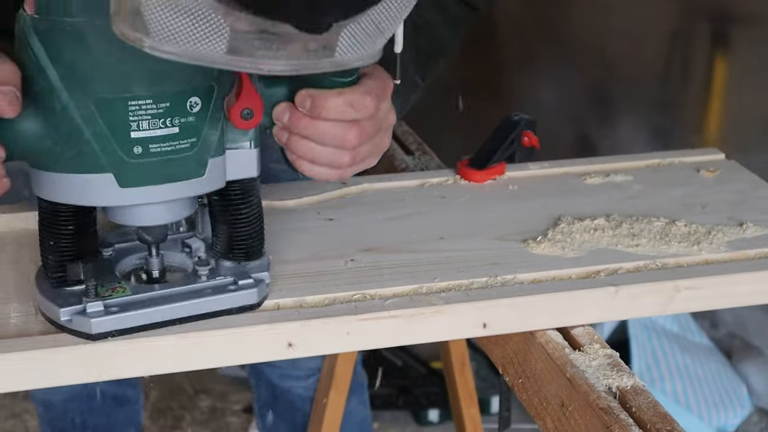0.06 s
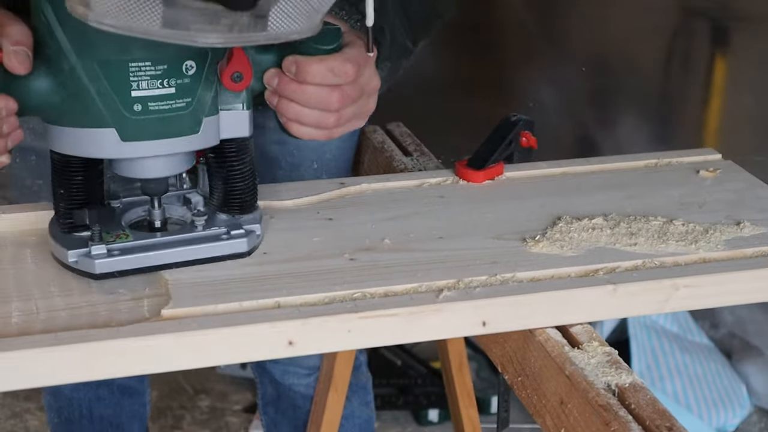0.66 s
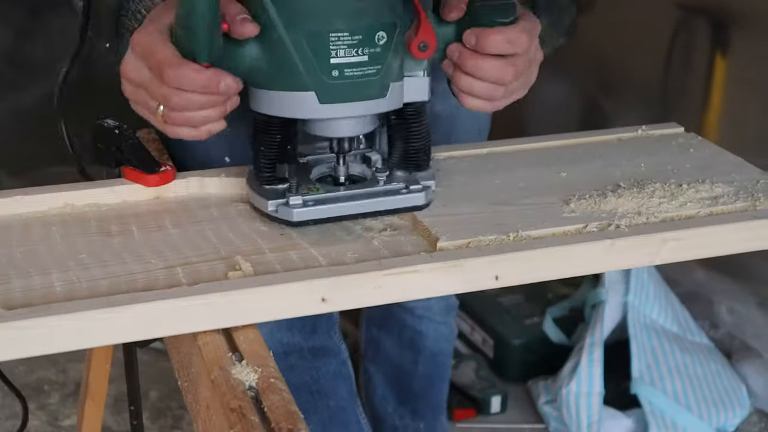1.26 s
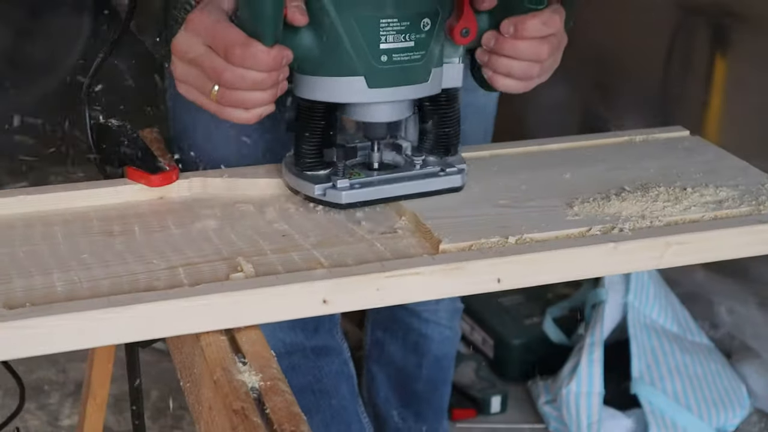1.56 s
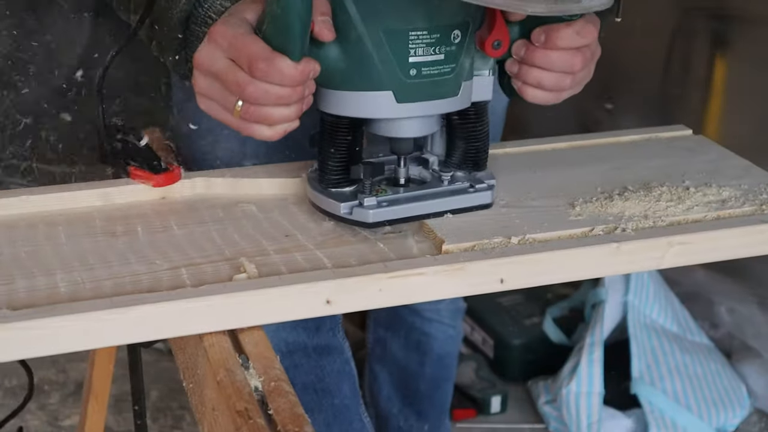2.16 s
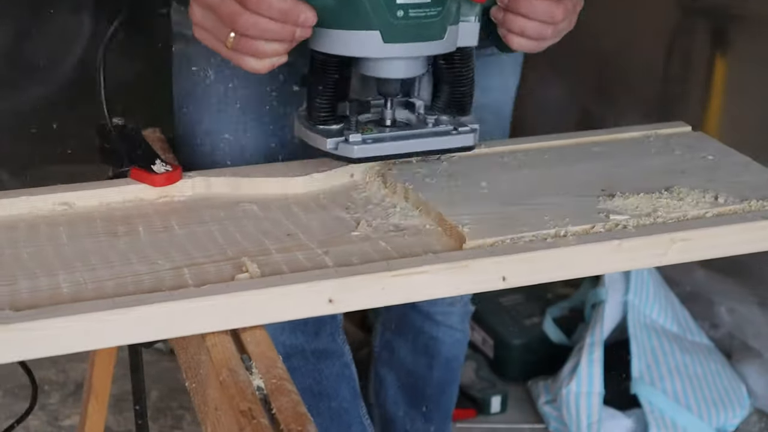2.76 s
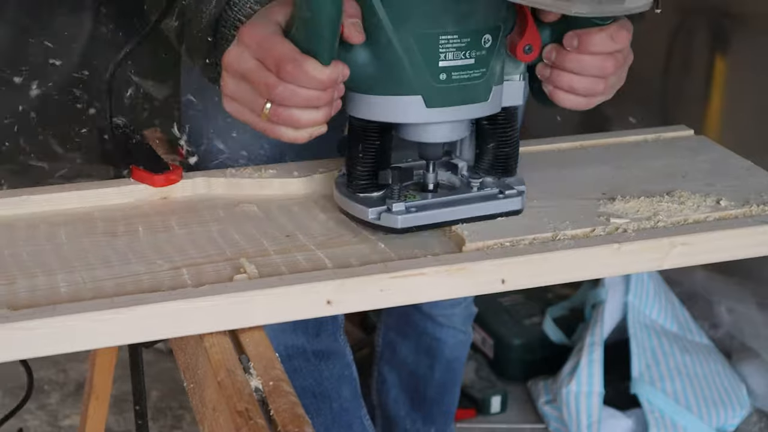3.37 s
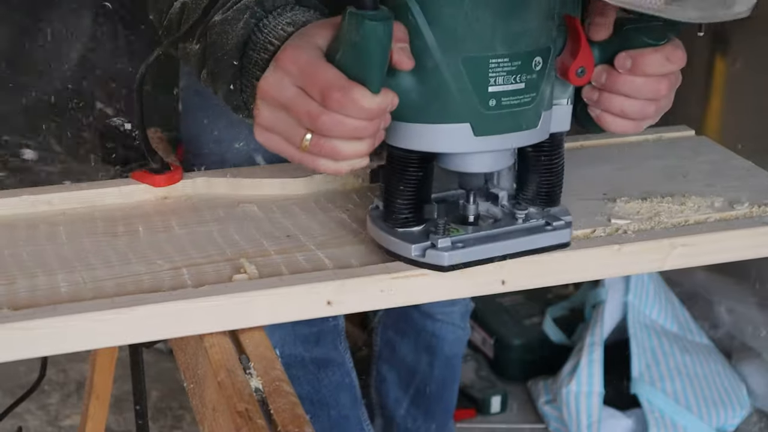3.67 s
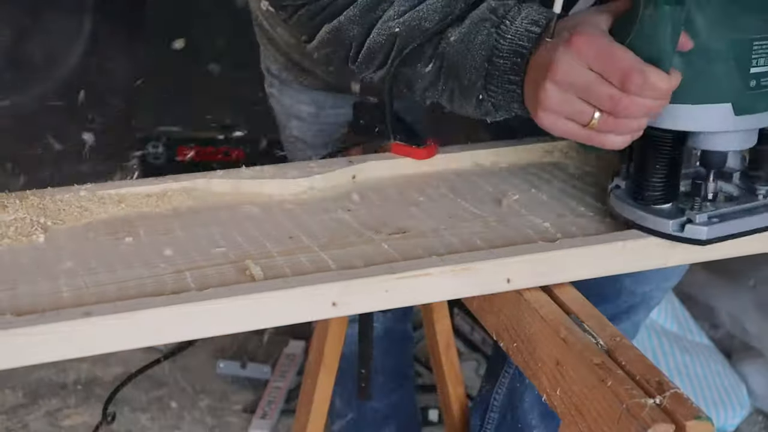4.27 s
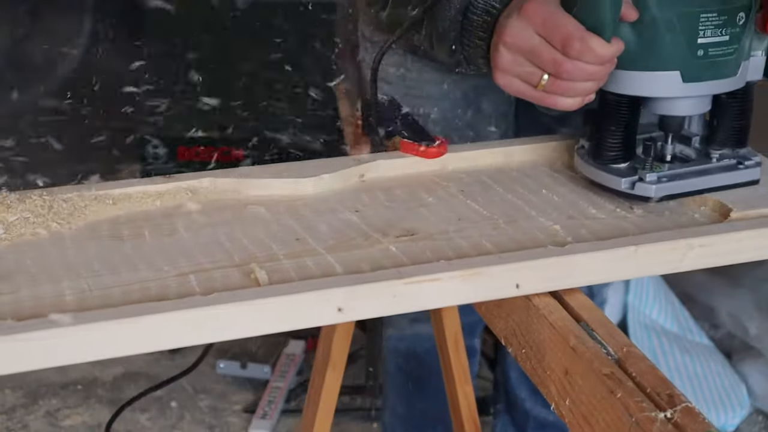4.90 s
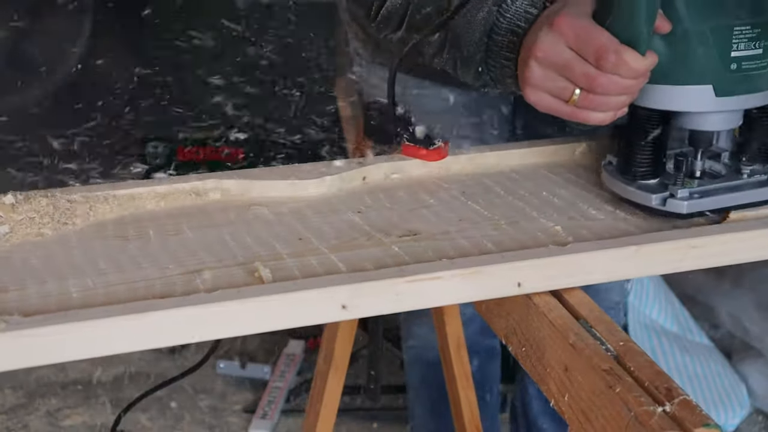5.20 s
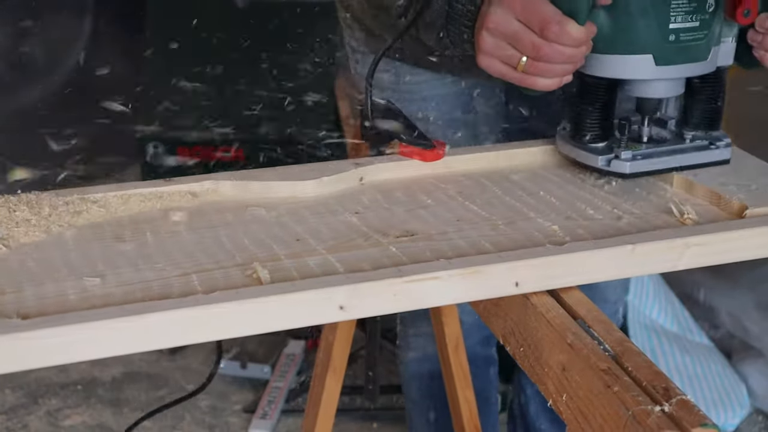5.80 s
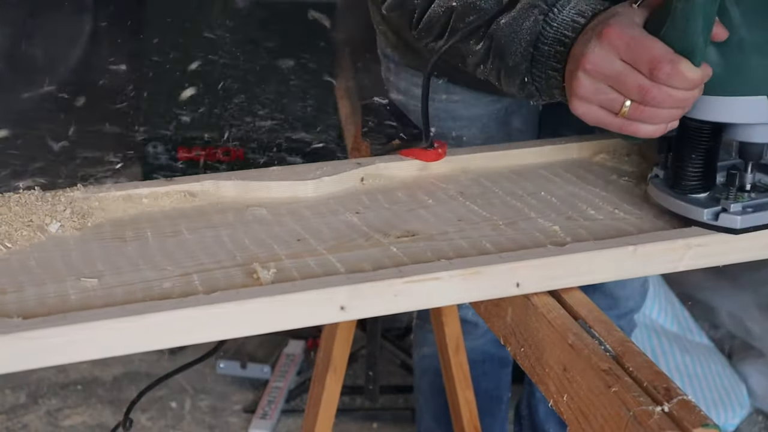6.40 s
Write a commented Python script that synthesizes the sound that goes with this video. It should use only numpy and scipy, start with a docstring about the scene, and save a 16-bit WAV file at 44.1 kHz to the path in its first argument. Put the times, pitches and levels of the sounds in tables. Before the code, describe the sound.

Short, high-pitched bursts of a router milling wood, dipping in pitch under load, with chip spray, ticks and one brief low drone.

```python
"""A high, squealing whine in quick bursts: a plunge router milling a recess in a board, in fast motion.
In each pass the spindle spins up, sags under load and coasts down. The bit chatters in the cut, air and
chips rush out, splinters tear, the base knocks and scrapes on the wood, and handling adds sharp ticks.
Once, the whine gives way to a low drone: the spindle at its natural pace."""
import sys
import numpy as np
from scipy import signal
from scipy.fft import rfft, irfft
from scipy.io import wavfile

SR = 44100
rng = np.random.default_rng(int(sys.argv[2]) if len(sys.argv) > 2 else 0)


def to_wav(sig):
    """Store sig (one row per channel, or 1-D mono) as 16-bit WAV at the path in sys.argv[1].

    Samples outside -1..1 are clipped; the rate is SR.
    """
    pcm = np.clip(np.atleast_2d(sig), -1, 1) * 32767
    pcm = np.round(pcm).astype(np.int16)
    wavfile.write(sys.argv[1], SR, pcm.T)  # frames by channels


N = 284440
TIME = np.arange(N) / SR

# passes of the tool, with the levels of its four harmonics and its air:
# on_s, off_s, shaft_db, flute_db, third_db, fourth_db, air_db, coasting_air_db, starting_kick_db
PASSES = [(-.2, 0.222, -51.5, -40, -48, -43.5, -39, -50.5, -5),
          (0.382, 0.975, -53.5, -42.5, -48, -46.5, -40.5, -75, 8),
          (1.446, 1.755, -43.5, -47.5, -48.5, -49.5, -38.5, -40.5, 15),
          (1.952, 2.702, -44, -41, -42, -50, -39.5, -51.5, 14),
          (2.881, 3.846, -45.5, -39, -41, -47.5, -40, -54, -6),
          (4.007, 4.282, -53.5, -47.5, -54, -56, -41, -47.5, 6.5),
          (4.493, 5.405, -52.5, -40, -49, -48.5, -39.5, -55.5, 9),
          (5.502, 6.6, -50, -36.5, -47, -47.5, -38, -55, -8)]
# cuts in which the bit chatters:
# start_s, end_s, pitch_hz, chatter_start_db, chatter_end_db, sideband_db, flute_boost_db
CUTS = [(-.02, 0.21, 5400, -40, -39, -44, 3.5), (0.479, 0.969, 5390, -45, -36.5, -45.5, 3.5),
        (1.477, 1.678, 5410, -35.5, -35, -44.5, 9), (2.096, 2.217, 5375, -27.5, -38.5, -44.5, 2),
        (2.213, 2.596, 5420, -44, -41.5, -44, 0), (2.977, 3.424, 5430, -39.5, -33.5, -47.5, -3.5),
        (3.432, 3.742, 5420, -46, -42, -45, 1.5), (4.076, 4.284, 5470, -34.5, -44, -43, 8.5),
        (4.604, 4.979, 5436, -43, -35, -47.5, 5.5), (5.131, 5.263, 5443, -33, -33, -44, 8.5),
        (5.277, 5.408, 5396, -38, -41, -40.5, 5.5), (5.717, 6.316, 5450, -38, -32, -49, 2),
        (6.351, 6.489, 5420, -37, -22, -41, -4)]


def undb(db):
    """Decibels to gain."""
    return 10 ** (np.asarray(db) / 20)


def unit(x):
    """Scale to rms 1."""
    return x / np.sqrt(np.mean(x ** 2) + 1e-20)


def curves(table):
    """The columns of a table, joined by straight lines in time."""
    times, *columns = np.transpose(table)
    return [np.interp(TIME, times, column) for column in columns]


def since(start):
    """Seconds gone by since a moment, zero before it."""
    return np.maximum(TIME - start, 0)


def held(times, values):
    """Each value holds from its time until the next."""
    return values[np.maximum(np.searchsorted(times, TIME) - 1, 0)]


def gate(start, end, edge_s=0.019):
    """Open between two times, with short fades."""
    return np.clip(np.minimum(TIME - start, end - TIME) / edge_s + .5, 0, 1)


def walk(rate_hz):
    """Random drift with a spread near 1 that changes course rate_hz times a second."""
    steps = rng.standard_normal(N // 32)
    return 1.456 * np.interp(TIME * rate_hz, np.arange(len(steps)), steps)


def colour(x, eq, size=2048):
    """Minimum-phase EQ through (frequency_hz, gain_db) points."""
    hz, db = np.transpose(eq)
    bins_hz = np.maximum(np.fft.rfftfreq(size, 1 / SR), 1)
    gain = undb(np.interp(np.log(bins_hz), np.log(hz), db))
    cepstrum = irfft(np.log(gain))
    cepstrum[1:size // 2] *= 2
    cepstrum[size // 2 + 1:] = 0
    return signal.fftconvolve(x, irfft(np.exp(rfft(cepstrum))))[:N]


def noise(eq):
    """Coloured noise of rms 1."""
    return unit(colour(rng.standard_normal(N), eq))


def bell_eq(x, bands, q):
    """Boost or cut narrow bands of a sound."""
    return x + sum((undb(db) - 1) * signal.lfilter(*signal.iirpeak(hz, q, fs=SR), x) for hz, db in bands)


def turning(hz):
    """Phase of something that turns at this speed."""
    return 2 * np.pi * np.cumsum(hz) / SR


def partial(phase, rough, flutter_db=2.5, rough_hz=700, swell_db=2):
    """A tone that flutters and swells as the tool moves, with a skirt of noise from uneven bites."""
    skirt = walk(rough_hz) * np.sin(phase) + walk(rough_hz) * np.cos(phase)
    tone = (np.sin(phase) + rough * skirt) / np.sqrt(.5 + rough ** 2)
    return undb(flutter_db * walk(80) + swell_db * walk(16)) * tone


def blows(hits, eq, ring_s, ring):
    """Each blow is one sharp push and a brief random rattle, coloured by what is struck."""
    out, t = np.zeros(N), TIME[:2048]
    for start_s, db in hits:
        start = int(start_s * SR)
        push = ring * rng.standard_normal(len(t)) * np.exp(-t / ring_s)
        push[0] += 1
        hit = colour(push, eq)[:N - start]
        out[start:start + len(hit)] += undb(db) * hit / np.abs(hit).max()
    return out


def spindle(spin_up_s=.022, coast_s=.38, switch_s=.012, free_hz=3577, sag_hz=278):
    """The motor spins up, sags and coasts. Gives speed in Hz and, 0 to 1, power, freedom and strain."""
    # speed the motor holds against the wood, one curve a pass: time_s, speed_hz
    speed_curves = [
        [(0, 3110), (.068, 3030), (.108, 2080), (.13, 2686), (.22, 3205)],
        [(.457, 3380), (.613, 3134), (.666, 3180), (.88, 3155), (.945, 3060), (.974, 3070)],
        [(1.52, 3192), (1.58, 3270), (1.65, 3314), (1.75, 3410)],
        [(2.055, 3450), (2.09, 3426), (2.13, 3265), (2.22, 3150), (2.357, 3136), (2.43, 3217), (2.65, 3252),
         (2.71, 3365)],
        [(2.947, 3480), (2.985, 3265), (3.02, 3303), (3.057, 3206), (3.11, 3313), (3.21, 3280), (3.29, 3220),
         (3.47, 3185), (3.54, 3240), (3.6, 3167), (3.84, 3294)],
        [(4.071, 3560), (4.079, 3098), (4.163, 3137), (4.218, 2956), (4.285, 3146)],
        [(4.576, 3320), (4.64, 3240), (4.7, 3124), (4.931, 3177), (5.11, 3458), (5.176, 3146), (5.28, 3053),
         (5.364, 3112), (5.41, 2607)],
        [(5.571, 3623), (5.687, 3419), (5.733, 3228), (5.85, 3237), (6.0, 3242), (6.098, 3128), (6.322, 3207),
         (6.348, 3390), (6.44, 3237)],
    ]
    speed, power = np.zeros(N), np.zeros(N)
    for (on, off, *_), curve in zip(PASSES, speed_curves):
        aim, = curves(curve)
        running = aim + (np.interp(on, TIME, speed) - aim) * np.exp(-since(on) / spin_up_s)
        speed = np.where(TIME >= on, running * np.exp(-since(off) / coast_s), speed)
        power += (1 - np.exp(-since(on) / switch_s)) * np.exp(-since(off) / switch_s)
    load = np.clip((free_hz - speed) / sag_hz, 0, 1)
    strain = power * np.clip((3000 - speed) / 500, 0, 1)
    grain_wobble = .003 * power * load * walk(28)  # the grain makes the loaded spindle waver
    return speed * (1 + grain_wobble), power, 1 - load, strain


def levels(power, free, strain, kick_s=.08, fade_db_per_s=42):
    """dB of the four harmonics and the air: set by the pass, shifted by load, sinking with power off."""
    on, off, *driven_db, air_db, coast_db, kick_db = np.transpose(PASSES)
    free_db, free_air_db = [9, -6.5, 6.5, 3], -3.5  # shifts as the bit runs free of the wood
    strain_tone_db, strain_air_db = -1, -2.5
    idle_db = [-12.5, -34, -17, -24]  # coasting harmonics, relative to the air
    singing = power ** 2.1  # the tones build up later than the air
    kick = held(on, kick_db) * np.exp(-since(held(on, on)) / kick_s)
    effort = strain * strain_tone_db + kick
    coasting = held(off, coast_db)
    fading = coasting - fade_db_per_s * since(held(off, off))
    tones_db = [singing * (held(on, db) + free * freed + effort) + (1 - singing) * (fading + idle)
                for db, freed, idle in zip(driven_db, free_db, idle_db)]
    blowing = held(on, air_db) + free * free_air_db + strain * strain_air_db
    return tones_db, power * blowing + (1 - power) * coasting


def whine(turn, rough, tones_db, cutting, entries):
    """Six spindle harmonics: the shaft sounds once a turn, the two flutes bite twice a turn."""
    shaft_db, flute_db, third_db, fourth_db = tones_db
    *_, boost_db = np.transpose(CUTS)
    out = undb(shaft_db) * partial(turn, rough)
    out += undb(flute_db + cutting * held(entries, boost_db)) * partial(2 * turn, rough)
    out += undb(third_db) * partial(3 * turn, 2 * rough)
    # chatter blurs the clean double bite and weakens its octave
    out += undb(fourth_db - 2.2 * cutting) * partial(4 * turn, 2 * rough)
    return out + undb(fourth_db - 6.5 - 3 * cutting) * sum(partial(k * turn, 2 * rough) for k in (5, 6))


def bearings(turn, rough):
    """The bearings sing between the harmonics."""
    # bearing tones: multiple_of_spindle_speed
    orders = [1.82, 2.1, 3.1]
    return sum(partial(order * turn, 2 * rough) for order in orders)


def chatter(speed, turn, rough, strain, entries, usual_speed_hz=3200):
    """The bit shakes in the cut and squeals; each turn modulates it and throws sidebands."""
    starts, ends, cut_hz, start_db, end_db, side_db, _ = np.transpose(CUTS)
    level_db = np.interp(TIME, np.ravel([starts, ends], "F"), np.ravel([start_db, end_db], "F"))
    pitch_hz = held(entries, cut_hz) + .9 * (speed - usual_speed_hz)
    shake = turning(pitch_hz * (1 + (0.00228 + 0.0137 * strain) * walk(300)))
    squeal = undb(level_db) * partial(shake, rough)
    # sidebands of the chatter and its octave: phases, level_db
    families = [([shake + k * turn for k in (1, 2, 3)], -3),
                ([k * turn - shake for k in (4, 5)], -8),
                ([2 * shake + k * turn for k in (-1, 0, 1)], -9),
                ([2 * shake - 2 * turn, 3 * turn - shake], -18),
                ([shake - turn], -19)]
    for phases, db in families:
        sidebands = sum(partial(phase, 2 * rough, flutter_db=3) for phase in phases)
        squeal += undb(held(entries, side_db) + db) * sidebands
    return squeal


def router(speed, power, strain, tones_db, air_db, cut_edge_s=.03):
    """Whine, bearings and chatter together; the metal base plate rings as their tones sweep past."""
    # resonances of the base plate: pitch_hz, boost_db
    plate = [(9750, 2), (11900, 4.5), (13350, 10), (15000, 5)]
    rough = .08 + .7 * strain + .39 * (1 - power)  # tones rasp under strain and blur when coasting
    turn = turning(speed * (1 + (0.00098 + 0.013 * strain) * walk(400)))  # strain shakes the speed
    starts, ends, *_ = np.transpose(CUTS)
    entries = starts - cut_edge_s / 2  # the bit first touches the wood
    cutting = sum(gate(start, end, cut_edge_s) for start, end in zip(starts, ends))
    tones = whine(turn, rough, tones_db, cutting, entries)
    tones += power * undb(air_db - 24) * bearings(turn, rough)
    tones += cutting * chatter(speed, turn, rough, strain, entries)
    return bell_eq(tones, plate, q=38)


def air(air_db, attack_s=.0027, decay_s=.031):
    """Fan air and sprays of fine chips: a bright hiss that swells unevenly."""
    # sudden sprays of chips: start_s, level_db
    sprays = [(.2, -38), (1.457, -22), (1.962, -27), (3.8, -40), (4.63, -27.5), (5.12, -29.5)]
    # bright hiss of the air: frequency_hz, gain_db
    rush_eq = [(30, -42), (100, -37), (200, -21), (400, -13.5), (1400, -13.5), (2300, -3), (4500, 4.5),
               (5800, 8.5), (8500, 6.5), (12000, 6), (16000, 5)]
    # narrow peaks and a dip that colour the hiss of the air: frequency_hz, gain_db
    hiss_bands = [(1020, 11.5), (1560, 11), (1880, 4), (2280, 4), (2850, -9.5), (3750, 0), (4420, 1)]
    chips = sum(undb(db) * (1 - np.exp(-since(s) / attack_s)) * np.exp(-since(s) / decay_s)
                for s, db in sprays)
    envelope = np.hypot(undb(air_db), chips) * undb(-3 + 0.93 * walk(70))
    return envelope * bell_eq(noise(rush_eq), hiss_bands, q=18)


def wood(cracks_per_s=300):
    """Knocks, crackling splinters and gritty scrapes, all sounding through the board."""
    # the base and chips knock on the board: start_s, peak_db
    knocks = [(.213, -29.5), (.402, -29), (.705, -24), (.724, -30.5), (1.563, -29), (2.257, -28.5),
              (2.692, -22), (2.706, -24.5), (2.973, -20.5), (2.984, -21.5), (3.279, -23), (3.312, -24),
              (3.798, -25.5), (4.517, -16.5), (4.658, -23), (4.673, -19.5), (4.6995, -12.5), (4.755, -22.5),
              (4.774, -30), (4.819, -19), (5.131, -30), (5.587, -30), (5.712, -22.5), (5.751, -26),
              (5.784, -19), (5.851, -19), (5.885, -18.5), (5.97, -24), (6.07, -30.5), (6.122, -23),
              (6.193, -24.5), (6.23, -47), (6.386, -31.5)]
    # splinters tear out: start_s, end_s, level_db
    splinters = [(0.69, 0.737, -55), (3.251, 3.335, -61), (4.656, 4.783, -41), (4.78, 4.914, -51),
                 (5.702, 5.821, -49), (5.83, 5.93, -43), (6.049, 6.242, -51.5)]
    # the base scrapes over the wood: start_s, end_s, level_db
    scrapes = [(0.204, 0.224, -37.5), (2.641, 2.669, -39), (2.664, 2.708, -41), (2.957, 3.001, -46.5),
               (3.779, 3.854, -37)]
    # body of the board: frequency_hz, gain_db
    board_eq = [(30, -35), (80, -18.5), (170, -10.5), (350, -0.5), (800, 2), (2500, -5), (6000, -7.5),
                (16000, -71)]
    # rasp of the scraping base: frequency_hz, gain_db
    scrape_eq = [(30, -25), (100, -28), (300, -4.5), (800, 3.5), (1800, -2), (3200, 7.5), (4800, -6.5),
                 (7000, -2.5), (16000, -67)]
    out = blows(knocks, board_eq, ring_s=.002, ring=.05)
    cracks = (rng.random(N) < cracks_per_s / SR) * rng.standard_normal(N)
    crackle = unit(colour(cracks, board_eq))
    out += crackle * sum(undb(db) * gate(start, end) for start, end, db in splinters)
    friction = rng.standard_normal(N) * undb(3 * walk(400))
    rub = unit(colour(friction, scrape_eq))
    return out + rub * sum(undb(db) * gate(start, end) for start, end, db in scrapes)


def ticks():
    """Sharp ticks of handling and of the bit catching."""
    # ticks: start_s, peak_db
    hits = [(.402, -29.5), (1.031, -18), (1.115, -32.5), (1.218, -33), (1.275, -28.5), (1.312, -28),
            (1.459, -34), (2.917, -28)]
    # their thin, bright snap: frequency_hz, gain_db
    tick_eq = [(100, -29), (8000, 15), (16000, 5)]
    return blows(hits, tick_eq, ring_s=.006, ring=.42)


def drone():
    """The whine pauses: at its natural pace the spindle is a low drone that sinks slowly."""
    # the slow spindle: time_s, pitch_hz, tone_db, third_harmonic_db, noise_db
    hum = [(0.973, 420, -82, -73, -45.5), (1.06, 394.8, -42.5, -53, -45), (1.19, 398, -51, -52.5, -48),
           (1.298, 382, -42, -57, -45.5), (1.466, 367, -52.5, -68, -51)]
    # a higher note as the drone starts: time_s, pitch_hz, level_db
    note = [(.975, 930, -55), (1.06, 1008, -43.5), (1.14, 1040, -65.5)]
    # dull noise around the drone: frequency_hz, gain_db
    drone_eq = [(30, -38), (90, -9.5), (200, -5), (420, 6), (1000, 3.5), (4000, -1.5), (16000, -11.5)]
    hz, tone_db, third_db, noise_db = curves(hum)
    note_hz, note_db = curves(note)
    phase = turning(hz * (1 + 0.00545 * walk(59.3)))
    tones = [(phase / 2, tone_db - 21.5), (phase, tone_db), (3 * phase, third_db),
             (turning(note_hz), note_db)]
    out = sum(undb(db) * partial(p, rough=.15, rough_hz=100) for p, db in tones)
    out += undb(noise_db + 2 * walk(69.85)) * noise(drone_eq)
    return out * gate(hum[0][0], hum[-1][0])


def workshop(x, early_s=.003, tail_s=.025, tail_db=-18, ear_lag_s=.000015, size=4096):
    """Close reflections set the two ears apart and shift as the tool moves; a faint tail follows."""
    # stereo width of the reflections: frequency_hz, side_db
    width_eq = [(30, 15), (120, -19.5), (280, -17), (1000, -15.5), (5500, -13), (9000, 1), (16000, -1.5)]
    here, there, late_left, late_right = rng.standard_normal((4, size))

    def reflect(pattern, decay_s):
        response = pattern * np.exp(-TIME[:size] / decay_s)
        return signal.fftconvolve(x, response / np.linalg.norm(response))[:N]
    place = 0.42 * walk(9)
    early = np.cos(place) * reflect(here, early_s) + np.sin(place) * reflect(there, early_s)
    side = colour(early, width_eq)
    side += ear_lag_s * SR * walk(4) * np.gradient(x) / 2  # a drifting delay between left and right
    tail = np.array([reflect(late_left, tail_s), reflect(late_right, tail_s)])
    return np.array([x + side, x - side]) + undb(tail_db) * tail


def scene(diffuse_db=-15.5):
    """Tool and board up close, with a wash of air noise returning from all round the room."""
    speed, power, free, strain = spindle()
    tones_db, air_db = levels(power, free, strain)
    near = ticks() + router(speed, power, strain, tones_db, air_db) + air(air_db) + wood() + drone()
    return workshop(near) + undb(diffuse_db) * np.array([air(air_db), air(air_db)])


def record(dry, top_hz=15750):
    """A steep low-pass trims the very top."""
    return signal.sosfilt(signal.ellip(10, .2, 80, top_hz, fs=SR, output="sos"), dry)


dry = scene()
out = record(dry)
to_wav(out)
```